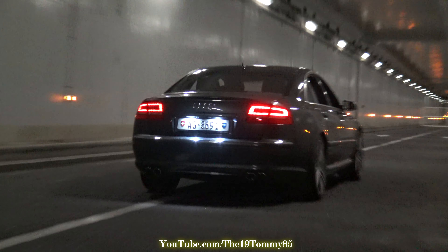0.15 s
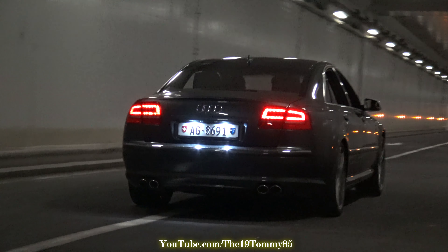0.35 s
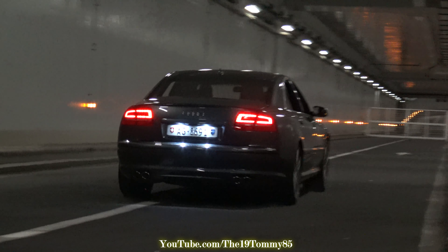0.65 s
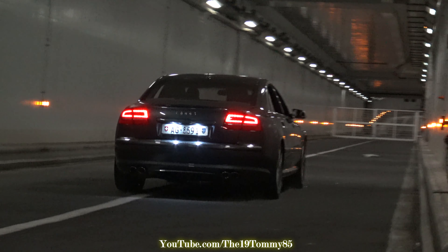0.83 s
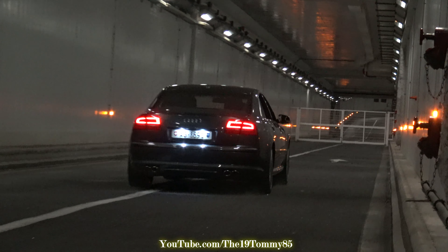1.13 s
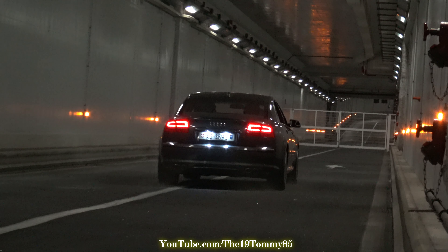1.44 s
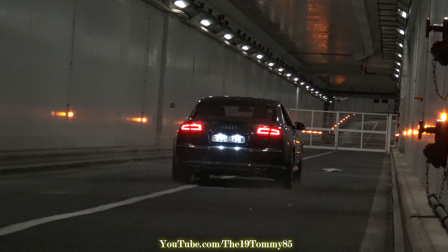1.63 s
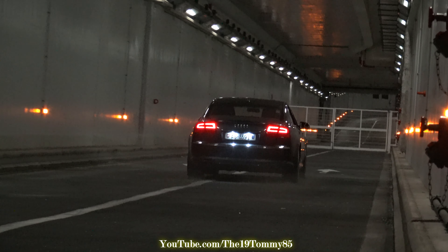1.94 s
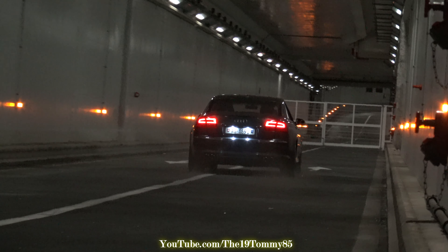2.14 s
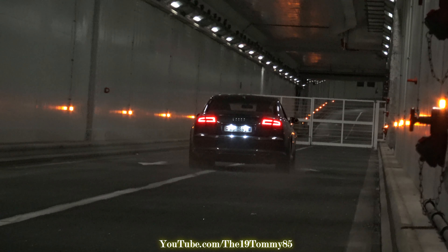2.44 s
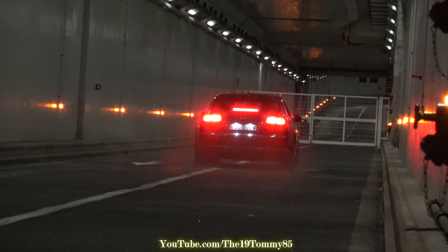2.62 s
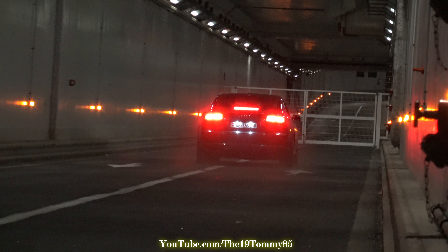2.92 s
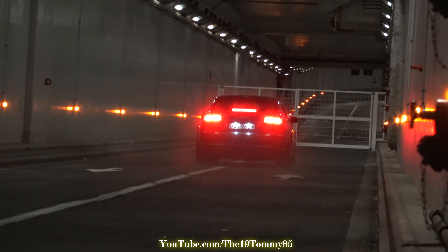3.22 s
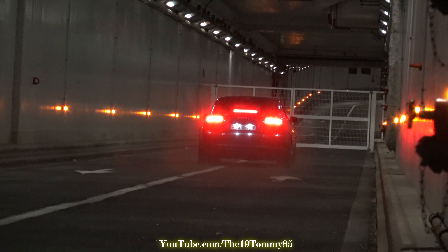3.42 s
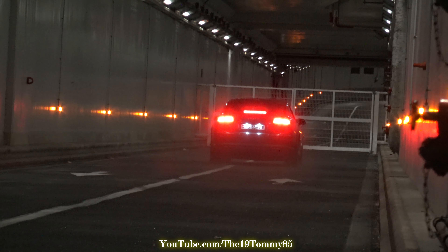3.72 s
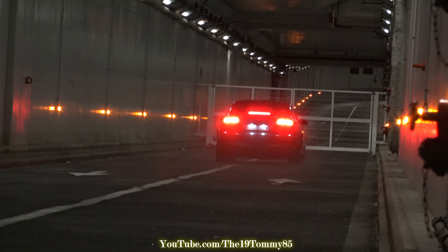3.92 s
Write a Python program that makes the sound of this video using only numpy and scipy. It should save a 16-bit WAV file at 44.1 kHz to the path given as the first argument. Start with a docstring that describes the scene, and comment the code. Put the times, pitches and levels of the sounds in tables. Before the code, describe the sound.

A powerful car accelerates hard through a road tunnel, shifts up with a crackling thud, then lifts off and fades into the echo.

```python
"""Grit ticks under the tyres as a V10 saloon pulls away at full throttle, close by at first.
The microphone is at the kerb behind it, in a concrete road tunnel. Two banks of uneven firings ring
the exhaust and the walls throw it back. The revs climb, an upshift crackles and thuds, then the driver
lifts off and brakes far down the tube. A limiter holds the peaks."""
import sys
import numpy as np
from scipy import signal
from scipy.fft import rfft, irfft, next_fast_len
from scipy.io import wavfile
from scipy.ndimage import uniform_filter1d, minimum_filter1d

SR = 44100
rng = np.random.default_rng(int(sys.argv[2]) if len(sys.argv) > 2 else 0)


def persist_wave(psi):
    """Save psi, clipped to +-1, as 16-bit WAV."""
    counts = np.round(np.clip(psi, -1, 1) * 32767).astype(np.int16)
    wavfile.write(sys.argv[1], SR, np.atleast_2d(counts).T)


N = 179158
LEAD = SR // 2  # a run-in, so the tunnel is already sounding at t = 0
T = np.arange(-LEAD, N) / SR
# the tyres grip, the upshift begins and ends, the throttle closes
GRIP_S, SHIFT_S, SHIFT_END_S, LIFT_S = 0.22, 1.386, 1.677, 2.012
TUNNEL_T60_S, TUNNEL_TREBLE_T60_S = 2.15, 0.21

# Table levels are relative; an order is a multiple of the engine's cycle rate.
# spectrum of the road wash in the tunnel: f/Hz, level/dB
ROAD_SPECTRUM = [(15, -51), (25, -13), (95, -36), (146, -22), (237, -11.5), (318, -6.5), (344, -3),
                 (394, -5), (475, -16.5), (588, -32), (655, -10.5), (856, -12.5), (1350, -19.5),
                 (1670, -26.5), (15000, -64.5)]
# stones snapping near the kerb: t/s, level/dB, f/Hz
STONES = [(0.0642, -11, 4800), (0.0985, -8.5, 4500), (0.132, -16, 4640), (0.145, -16, 4630),
          (0.1654, -20, 4360), (0.177, -7.5, 3450), (0.1954, -12, 3530), (0.2389, -13.5, 3530),
          (0.3855, -18, 3680)]
# engine speed as the firing rate of one bank: t/s, f/Hz
BANK_RATE = [(0, 141.2), (.3, 169.3), (.5, 186.7), (.7, 201.8), (1.0, 230.8), (1.15, 240), (1.3, 245.1),
             (1.42, 233.8), (1.61, 223), (1.74, 164), (1.9, 161.9), (2.1, 168.8), (2.7, 164.3),
             (3.3, 158.5), (3.55, 154.6), (3.8, 139.2), (4.06, 129.7)]
# loudness of the roar: an opening flare, a brief dip, then steady: t/s, level/dB
ROAR_LEVEL = [(0, 3), (.13, -0.5), (.28, -1), (.43, 1.2), (1.3, 0)]
# the ten firings of a cycle, banks alternating: level/dB, manifold lag/ms
CYLINDERS = [(0, 0.035), (-3, 0.313), (-1, 0.18), (-3, 0.057), (1.5, 0.37), (-28, 0.067), (-14, 0.042),
             (-10, 0.5), (-2, 0.23), (-13.5, 0.045)]
# the low drone: order, level on throttle/dB, level coasting/dB
DRONE_ORDERS = [(2, -39, -66), (3, -33.5, -59), (4, -39.5, -43)]
# brief booms at the upshift, last push and braking: t/s, order, peak level/dB, rise and fall time/s
BOOMS = [(1.27, 2, -27, 0.074), (1.41, 3, -16.5, .045), (1.52, 2, -20.5, .05), (1.65, 2, -20.5, 0.041),
         (2.02, 10, -16.5, .04), (2.035, 25, -10.5, 0.045), (3.22, 4, -32.5, 0.1), (3.25, 9, -31, .1)]
# spectrum of fuel burning in the pipes: f/Hz, level/dB
CRACKLE_SPECTRUM = [(1500, 0), (3000, -8.5), (5000, -1), (7500, -5), (10000, -11.5), (13000, -12.5),
                    (15500, -22)]
# spectrum of the rasp at the tailpipes: f/Hz, level/dB
RASP_SPECTRUM = [(1180, -6.5), (2000, -4.5), (2480, -9.5), (3230, -11.5), (3610, -9), (3970, -12.5),
                 (4400, -9.5), (5220, -12.5), (6040, -17), (8440, -29.5), (12900, -34.5), (15500, -45)]
# spectrum of the rushing exhaust gas: f/Hz, level/dB
GAS_SPECTRUM = [(200, -12.5), (300, -10), (400, -4), (500, -0.5), (590, 1), (700, -9.5), (850, 0.5),
                (1030, -7.5), (1200, -6.5), (1550, -9.5), (1850, -10), (2300, -21), (2800, -20.5)]
# exhaust pipe resonances: f/Hz, width/Hz, level/dB
PIPE_MODES = [(504, 37, -4), (573.5, 38, -1.5), (834, 58, 1), (887, 77, -8), (1163, 59, 1), (1318, 84, -4),
              (1550, 220, -21), (1865, 243, -9.5), (2060, 150, -18.5)]
# partials that unequal cylinders add to the note: order, level/dB
SNARL_ORDERS = [(7, 3.5), (12, -16), (13, -17), (14, -21.5), (17, -31), (18, -19), (22, -10.5), (23, -24),
                (24, -17.5), (28, -17), (29, -18), (30, -21.5), (33, -10), (35, -14), (36, -17), (38, -23),
                (39, -12), (43, -20.5), (50, -27), (53, -20.5)]
# pitches that exhaust and tunnel favour: f/Hz, half width/Hz, level/dB
HOWLS = [(145, 20, -30), (192.8, 13, -19.5), (290, 13, -19.5), (336.5, 17.4, -8.5), (454.5, 16, -14.5),
         (485.3, 13, -20), (595, 51, -18.5), (657, 18, -24.5), (838, 56, -14.5), (949.5, 25, -19),
         (1180.3, 30, -35)]
# the clear engine note: order, level in first gear/dB, level in second/dB, level coasting/dB
NOTE_ORDERS = [(5, 0, 4, -7.5), (9, -18, -11, -19.5), (10, 0.5, -8.5, -26.5), (15, 2, 0, -27),
               (20, -.5, -9, -28), (25, -1.5, -1, -31)]


def undb(db):
    """Decibels to gain."""
    return 10 ** (np.asarray(db) / 20)


def unit(x):
    """Scale to rms 1."""
    return x / np.sqrt(np.mean(x ** 2))


def curve(table):
    """A (t/s, value) table as a curve in time."""
    return np.interp(T, *np.transpose(table))


def ramp(start_s, length_s):
    """Rises from 0 to 1."""
    return np.clip((T - start_s) / length_s, 0, 1)


def shifting(attack_s, release_s):
    """Rises towards 1 during the upshift, then returns to 0."""
    return ramp(SHIFT_S, attack_s) - ramp(SHIFT_END_S, release_s)


def coasting(fall_s):
    """0 on throttle; settles to 1 after the driver lifts off."""
    return 1 - np.exp(-np.maximum(T - LIFT_S, 0) / fall_s)


def lift_off(step_db, fall_s, fade_db_per_s):
    """Level in dB: a quick change as the throttle closes, then a fade with distance."""
    return step_db * coasting(fall_s) + fade_db_per_s * np.maximum(T - LIFT_S, 0)


def noise():
    """White noise for the whole scene."""
    return rng.standard_normal(len(T))


def wander(rate_hz):
    """A smooth random curve of rms 1."""
    hold = int(SR / rate_hz)
    steps = np.repeat(rng.standard_normal(len(T) // hold + 1), hold)
    return unit(uniform_filter1d(uniform_filter1d(steps, hold), hold)[:len(T)])


def colour(x, spectrum):
    """Filter by a (f/Hz, level/dB) spectrum that falls 30 dB an octave beyond its ends."""
    hz, db = np.transpose(spectrum)
    size = next_fast_len(len(x) + 8192)
    f = np.maximum(np.fft.rfftfreq(size, 1 / SR), 1)
    octaves_beyond = np.abs(np.log2(f / np.clip(f, hz[0], hz[-1])))
    gain = undb(np.interp(np.log(f), np.log(hz), db) - 30 * octaves_beyond)
    return irfft(rfft(x, size) * gain, size)[:len(x)]


def ring(x, hz, *widths_hz):
    """A resonance with gain 1 at its centre, applied once per width."""
    for width in widths_hz:
        x = signal.lfilter(*signal.iirpeak(hz, hz / width, fs=SR), x)
    return x


def resonance(modes, hz):
    """Gain of a set of resonances for a partial at this pitch."""
    return sum(undb(db) / (1 + ((hz - centre) / width) ** 2) for centre, width, db in modes)


def partial(turns, db, waver_db, smear_rad):
    """One engine order; shifting wall echoes make its level and phase waver."""
    phase = 2 * np.pi * (turns + rng.random()) + smear_rad * wander(30.07)
    return np.sqrt(2) * undb(db + waver_db * wander(25.32)) * np.sin(phase)


def tunnel(x, early_db, tail_db, early_t60_s=0.46):
    """At the kerb: direct sound, a dense spray off the near walls, a long dull tail down the tube."""
    t = np.arange(2 * SR) / SR
    spray, low, high = rng.standard_normal((3, len(t))) * (t > .006)
    early_fade, tail_fade, treble_fade = (
        1000 ** (-t / t60) for t60 in (early_t60_s, TUNNEL_T60_S, TUNNEL_TREBLE_T60_S))
    early = undb(early_db) * spray * early_fade / np.linalg.norm(early_fade)
    tail = colour(low, [(40, 18), (1500, 3), (6000, -14)]) * tail_fade + .5 * high * treble_fade
    response = early + undb(tail_db) * tail / np.linalg.norm(tail_fade)
    return unit(x + signal.fftconvolve(x, response)[:len(x)])


def road_wash(level_db=-30, fade_db_per_s=-2):
    """Tyre roll and old echoes fill the tunnel with a wash that sinks once the car is far off."""
    wash = unit(colour(noise(), ROAD_SPECTRUM))
    return wash * undb(level_db + fade_db_per_s * np.maximum(T - 3, 0) + 0.096 * wander(6.6))


def top_hiss(level_db=-56):
    """A faint high hiss at full throttle that fades after the lift-off."""
    hiss = unit(colour(noise(), [(7000, -2), (9000, -1), (11500, 4), (13500, -5), (15500, -9)]))
    return hiss * undb(level_db + lift_off(step_db=-6, fall_s=.06, fade_db_per_s=-38))


def grit(stones_db=-1, decay_s=0.0017, width_hz=2600, scrub_db=-36, release_s=0.084):
    """Near the microphone, stones snap under the tyres amid finer grains that die away once they grip."""
    grains = noise() * undb(1.5 * wander(680))
    scrub = undb(scrub_db) * np.exp(-np.maximum(T - GRIP_S, 0) / release_s)
    out = unit(colour(grains, [(2500, 3), (5000, 5.5), (8000, -4), (15000, -9)])) * scrub
    for at_s, db, hz in STONES:
        crack = noise() * (T >= at_s) * np.exp(-np.abs(T - at_s) / decay_s)
        snap = ring(crack, hz, width_hz, 2 * width_hz)
        out += undb(db + stones_db) * snap / np.abs(snap).max()
    return out


def firings(bank_turns, scatter_db=1, jitter_ms=0.05):
    """Two pulses per bank turn; each cylinder has its own strength and path, and no two burns match."""
    k = np.arange(int(2 * bank_turns[-1]))
    db, lag_ms = np.array(CYLINDERS)[k % len(CYLINDERS)].T
    jitter, scatter = rng.standard_normal((len(k), 2)).T
    times = np.interp(k / 2, bank_turns, T) + (lag_ms + jitter_ms * jitter) / 1000
    sizes = undb(db + scatter_db * scatter)
    at = np.clip((times - T[0]) * SR, 0, len(T) - 2)
    i = at.astype(int)
    share = at - i  # each pulse is split between two samples
    return np.bincount(i, sizes * (1 - share), len(T)) + np.bincount(i + 1, sizes * share, len(T))


def puffs(pulses, puff_s, echo_db):
    """Turbulent gas follows each firing; wall echoes blur a share of it into steady hiss."""
    envelope = signal.lfilter([1], [1, -np.exp(-1 / (puff_s * SR))], pulses)
    return unit(unit(envelope * noise()) + undb(echo_db) * noise())


def boom(cycles, rumble_db=-35, surge_db=-22, rise_s=0.15, fall_s=0.26):
    """Low orders drone over a rumble that surges as the next gear bites; single orders boom out."""
    rumble = unit(colour(noise(), [(35, -7), (55, -12.5), (80, 5), (110, -4.5), (160, 6), (240, -1)]))
    steady = undb(rumble_db + lift_off(step_db=1, fall_s=.2, fade_db_per_s=-3.5))
    surge = undb(surge_db) * np.exp(np.minimum((T - SHIFT_END_S) / rise_s, (SHIFT_END_S - T) / fall_s))
    coast = coasting(fall_s=0.098)
    drone = booms = 0
    for order, on_db, off_db in DRONE_ORDERS:
        drone += partial(order * cycles, on_db + (off_db - on_db) * coast, waver_db=3, smear_rad=0.87)
    for at_s, order, db, swell_s in BOOMS:
        swell = np.exp(-np.abs(T - at_s) / swell_s)
        booms += swell * partial(order * cycles, db, waver_db=2, smear_rad=0.22)
    return (steady + surge) * rumble + drone * ramp(-0.12, 0.56) + booms


def upshift_crackle(pulses, level_db=-30, spread_db=-5.5):
    """With the spark held back, fuel burns in the pipes as a ragged crackle."""
    bursts = puffs(pulses * undb(spread_db * wander(120)), puff_s=0.0014, echo_db=1)
    crackle = unit(colour(bursts, CRACKLE_SPECTRUM))
    return crackle * undb(level_db) * shifting(attack_s=0.01, release_s=0.024)


def tailpipe_rasp(pulses, level_db=-29.5, open_db=6.5, shift_db=4, buzz_db=-5, second_gear_db=-2):
    """Hiss and the sharp edges of the firings; off the throttle only a smooth dull hiss is left."""
    buzz = undb(buzz_db) * tunnel(unit(pulses), early_db=8, tail_db=0.5, early_t60_s=0.1)
    bright = unit(colour(puffs(pulses, puff_s=0.0011, echo_db=4) + buzz, RASP_SPECTRUM))
    hiss = colour(noise(), RASP_SPECTRUM)
    dull = unit(colour(hiss, [(2000, 0.5), (5000, -4), (8000, -3), (11000, -10), (15000, -18)]))
    db = (level_db + open_db * ramp(0.59, 0.38)  # opens up during the first climb of the revs
          + shift_db * shifting(attack_s=0.12, release_s=0.054)
          + second_gear_db * ramp(SHIFT_END_S, 0.12)
          + lift_off(step_db=-21, fall_s=0.19, fade_db_per_s=-0.4))
    coast = coasting(fall_s=0.077)
    return undb(db) * ((1 - coast) * bright + coast * dull)


def singing_resonance(pulses, hz=836, width_hz=14, level_db=-24, second_gear_db=3):
    """One narrow resonance holds a steady pitch under load and rings on after the lift-off."""
    tone = unit(ring(pulses, hz, width_hz, 2 * width_hz))
    tone /= np.sqrt(uniform_filter1d(tone ** 2, size=8001) + .01)  # evens out its level
    db = (level_db + second_gear_db * ramp(SHIFT_S, 0.48)
          + lift_off(step_db=-13.5, fall_s=.2, fade_db_per_s=-11))
    return tone * ramp(0, 0.58) * undb(db)


def snarl(cycles, cycle_hz, level_db=-12.5, revs_db_per_octave=8, shift_db=-17, follow_roar=0.68):
    """Under throttle the in-between orders light up in turn as they sweep through the pipe resonances."""
    out = 0
    for order, db in SNARL_ORDERS:
        tone = partial(order * cycles, db + 3 * wander(7.22), waver_db=3, smear_rad=0.43)
        out += resonance(PIPE_MODES, order * cycle_hz) * tone
    drive_db = (level_db + follow_roar * curve(ROAR_LEVEL)
                + revs_db_per_octave * np.log2(cycle_hz / cycle_hz.mean())
                + shift_db * shifting(attack_s=0.23, release_s=0.19)
                + lift_off(step_db=-30, fall_s=0.27, fade_db_per_s=-4.5))
    return out * undb(drive_db)


def exhaust_roar(pulses, level_db=-10, pipe_db=-8, gas_db=-4, shift_db=3, coast_pipe_db=-4):
    """Firings ring the pipes over a rush of gas and echo in the tunnel; the shift blows harder."""
    pipes = sum(undb(db) * ring(pulses, hz, 2 * width, 2 * width) for hz, width, db in PIPE_MODES)
    pipes = tunnel(pipes, early_db=3, tail_db=-4.5)
    pipes *= undb(pipe_db + coast_pipe_db * coasting(fall_s=0.46))
    gas = unit(colour(puffs(pulses, puff_s=0.0019, echo_db=3.5), GAS_SPECTRUM))
    db = (level_db + curve(ROAR_LEVEL)
          + shift_db * shifting(attack_s=0.17, release_s=0.26)
          + lift_off(step_db=-12, fall_s=0.2, fade_db_per_s=-3))
    return undb(db) * (pipes + undb(gas_db) * gas)


def engine_note(cycles, cycle_hz, level_db=-1, hang_db=-12, shift_db=-12, build_s=0.0099):
    """Orders swell a moment late as they cross a howl, duck in the shift and hang on in the tunnel."""
    drive_db = level_db + shift_db * shifting(attack_s=0.29, release_s=0.19)
    second_gear = ramp(SHIFT_S, SHIFT_END_S - SHIFT_S)
    coast = coasting(fall_s=0.13)
    late_hz = np.interp(T - build_s, T, cycle_hz)
    direct = 0
    for order, first_db, second_db, coast_db in NOTE_ORDERS:
        gear_db = (1 - second_gear) * first_db + second_gear * second_db
        db = drive_db + (1 - coast) * gear_db + coast * coast_db
        tone = partial(order * cycles, db, waver_db=2.5, smear_rad=0.51)
        direct += resonance(HOWLS, order * late_hz) * tone
    hang = tunnel(direct, early_db=16.5, tail_db=13.5)
    return direct + undb(hang_db) * direct.std() * hang


def scene():
    """The mono sound at the kerb: engine speed times the firings and orders, over grit, hiss and road."""
    bank_hz = uniform_filter1d(curve(BANK_RATE), size=2001)
    bank_turns = np.cumsum(bank_hz) / SR
    per_bank = len(CYLINDERS) / 2
    cycles, cycle_hz = bank_turns / per_bank, bank_hz / per_bank
    pulses = firings(bank_turns)
    tones = engine_note(cycles, cycle_hz) + snarl(cycles, cycle_hz) + boom(cycles)
    exhaust = exhaust_roar(pulses) + singing_resonance(pulses)
    exhaust += tailpipe_rasp(pulses) + upshift_crackle(pulses)
    return (tones + exhaust + grit() + top_hiss() + road_wash())[None, LEAD:]


def record(dry, top_hz=15650):
    """After the microphone, a fast limiter holds the peaks and a steep low-pass cuts the top."""
    needed_gain = np.minimum(1, 1 / (np.abs(dry) + 1e-9))
    gain = uniform_filter1d(minimum_filter1d(needed_gain, size=129), size=129)
    low_pass = signal.ellip(10, .2, 80, top_hz, fs=SR, output="sos")
    return signal.sosfilt(low_pass, dry * gain)


dry = scene()
out = record(dry)
persist_wave(out)
```